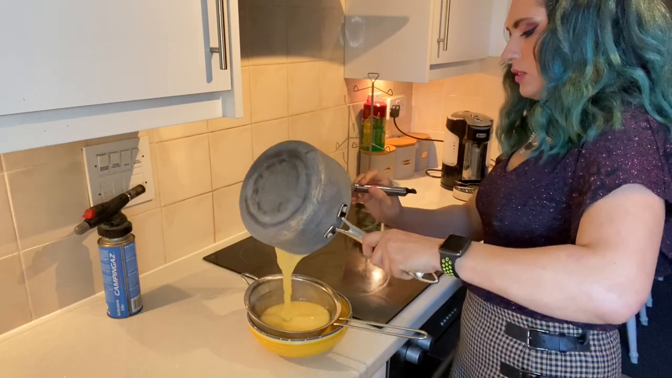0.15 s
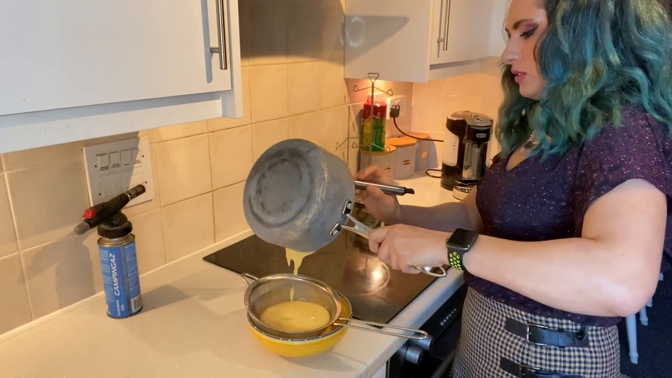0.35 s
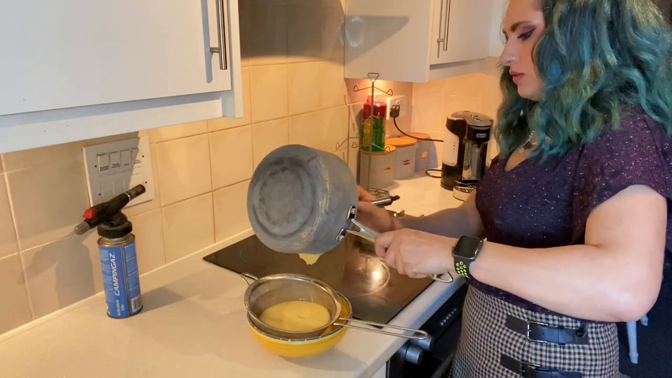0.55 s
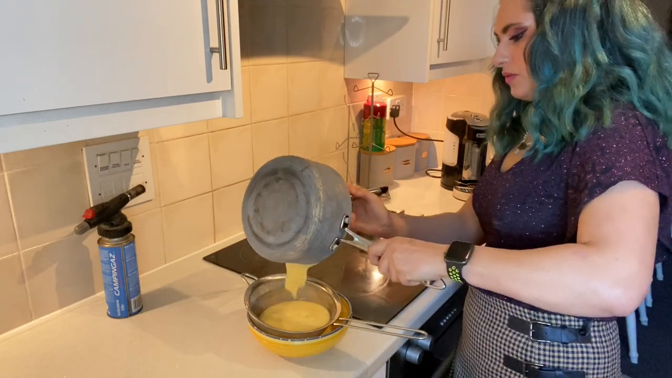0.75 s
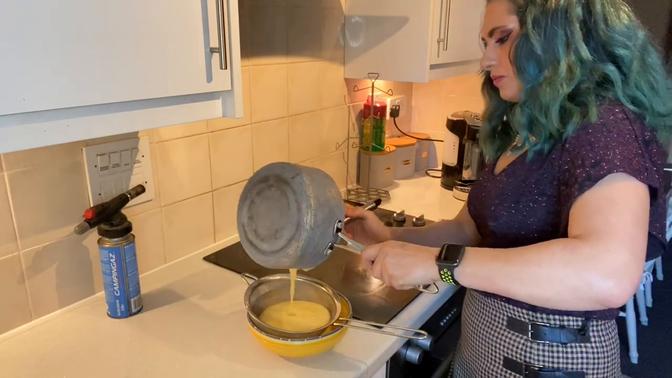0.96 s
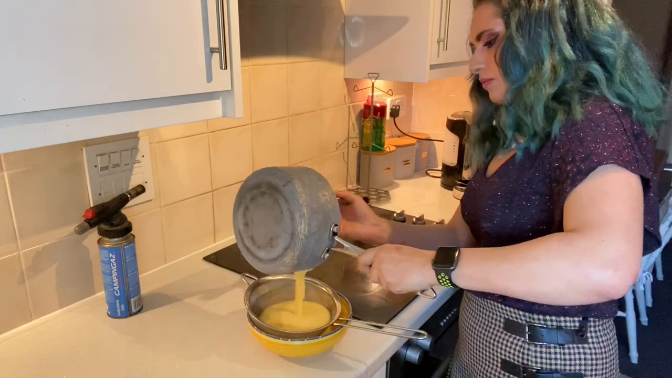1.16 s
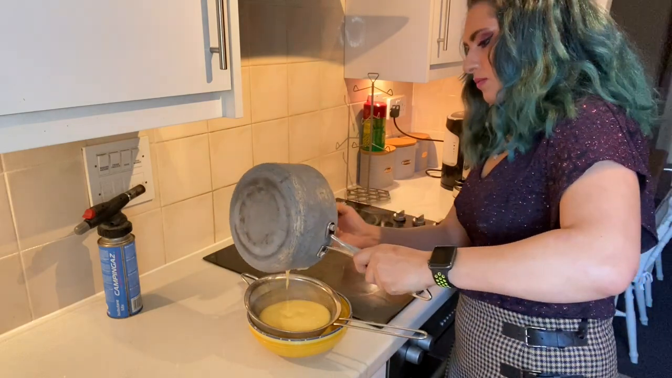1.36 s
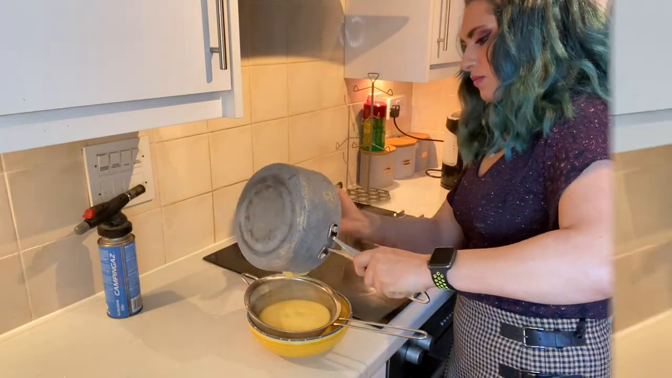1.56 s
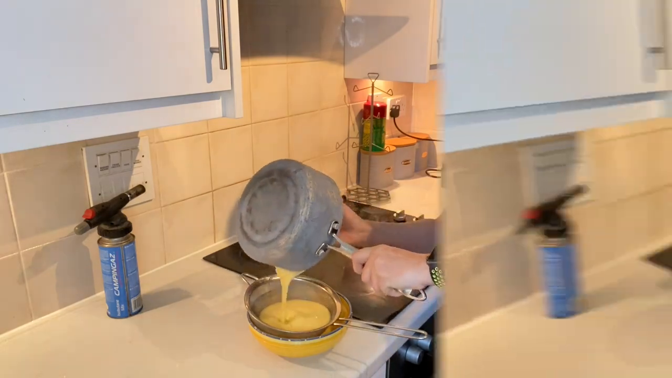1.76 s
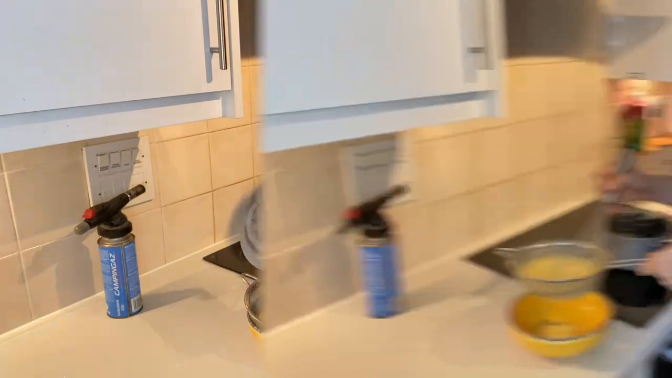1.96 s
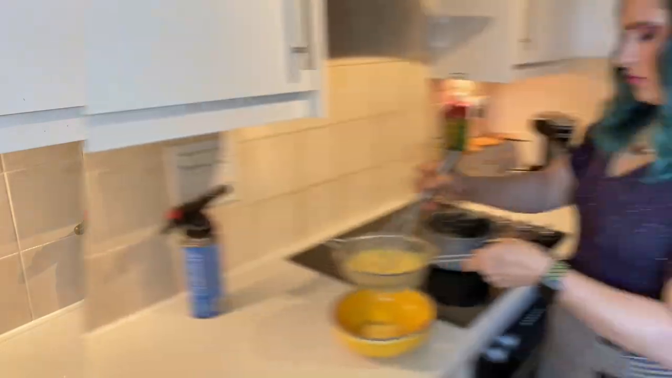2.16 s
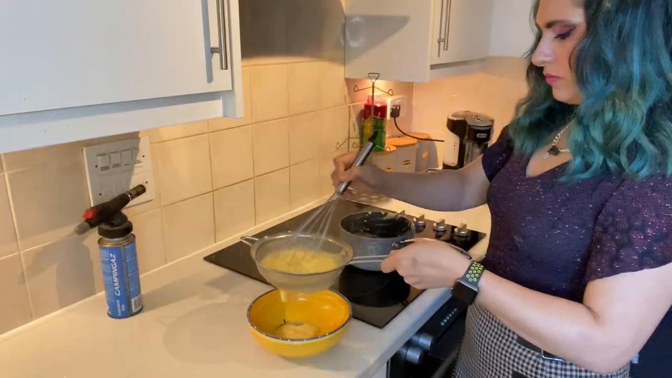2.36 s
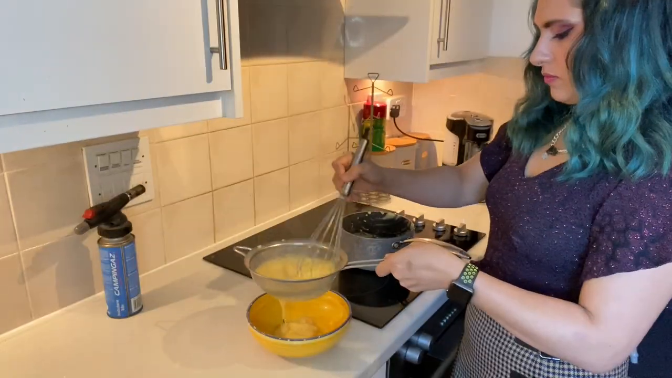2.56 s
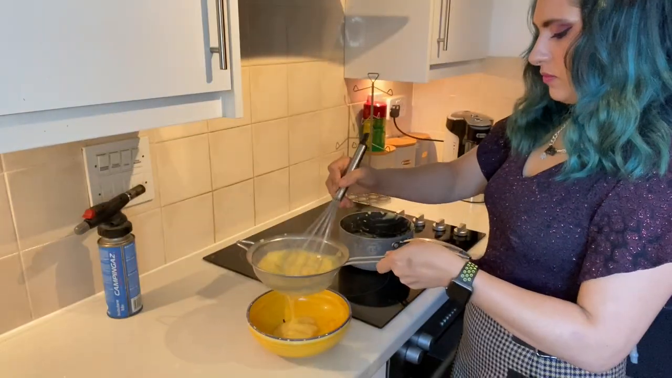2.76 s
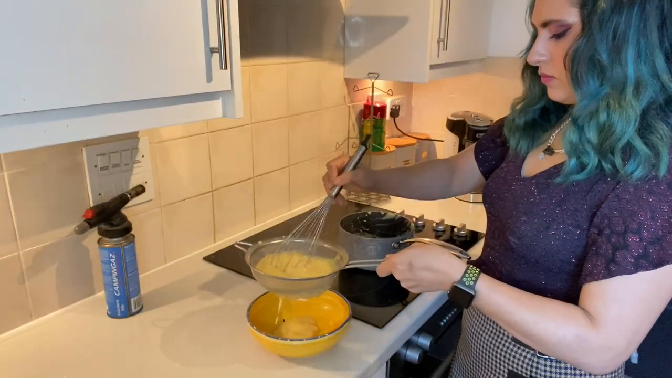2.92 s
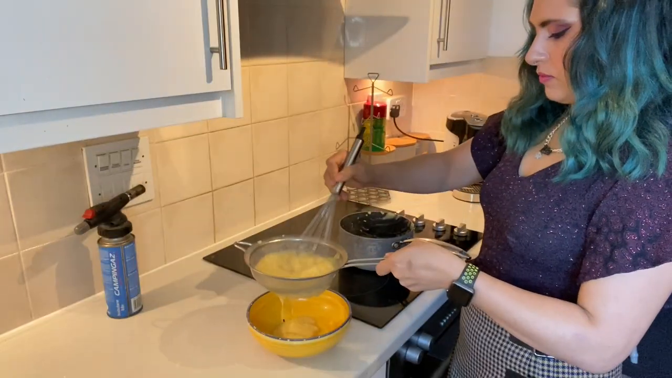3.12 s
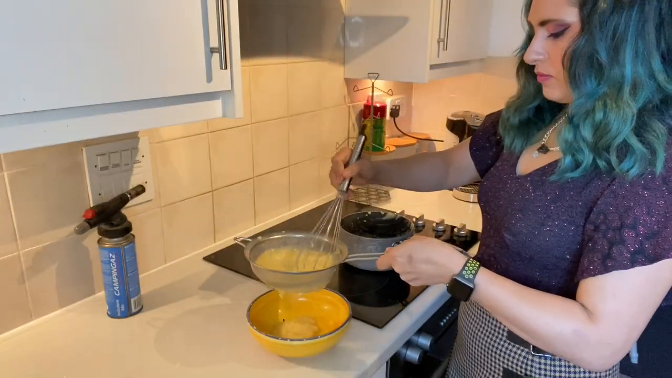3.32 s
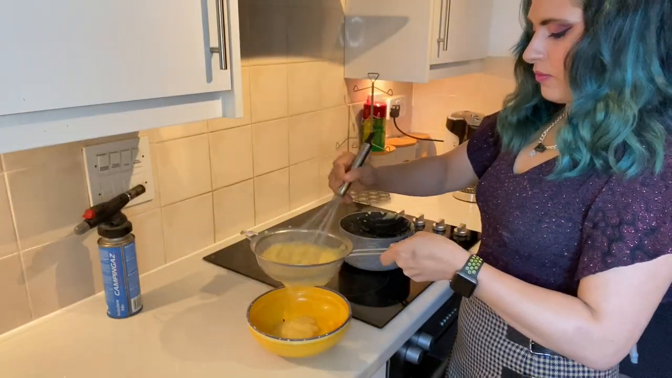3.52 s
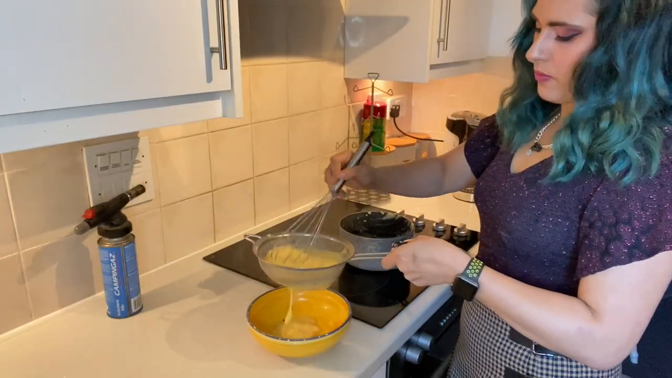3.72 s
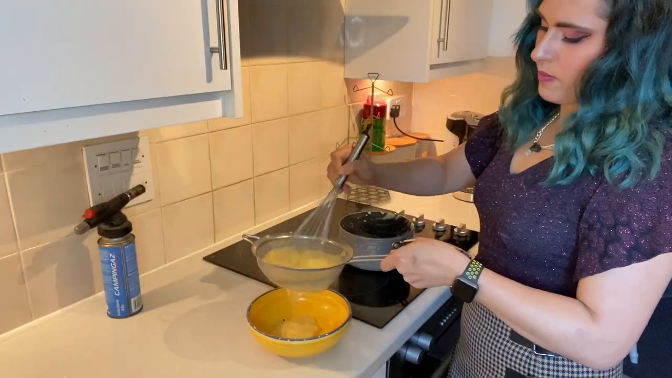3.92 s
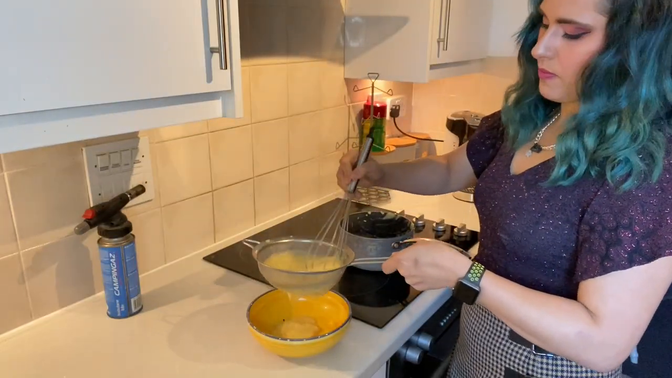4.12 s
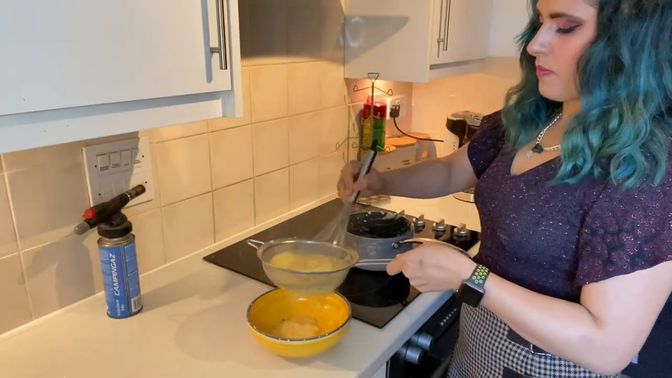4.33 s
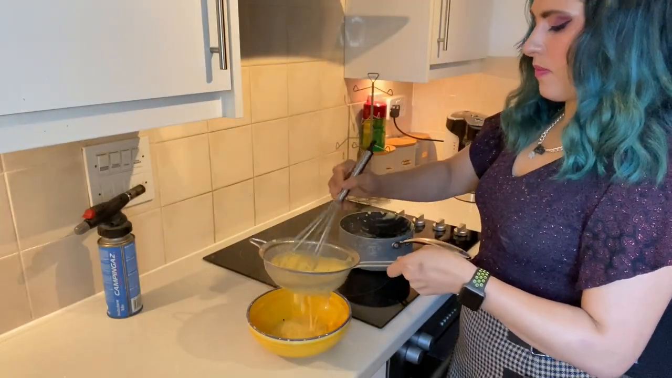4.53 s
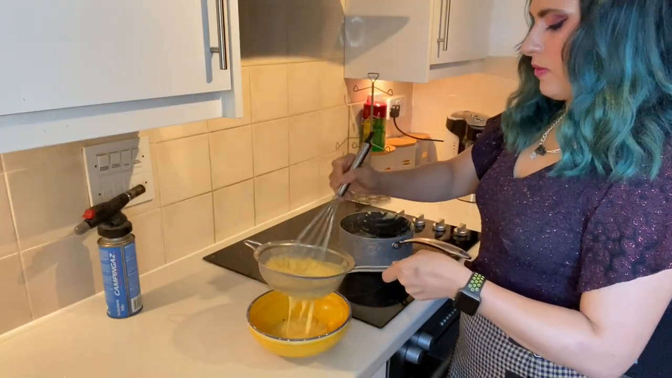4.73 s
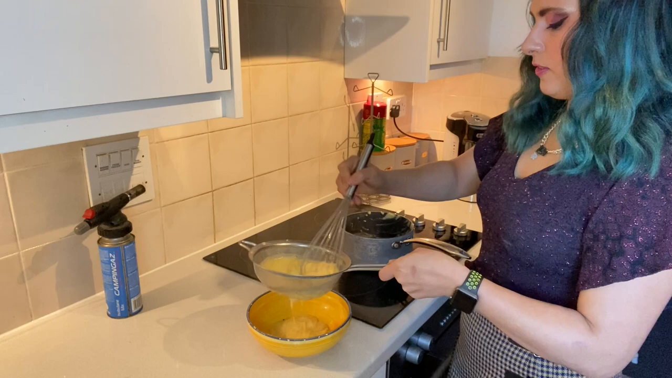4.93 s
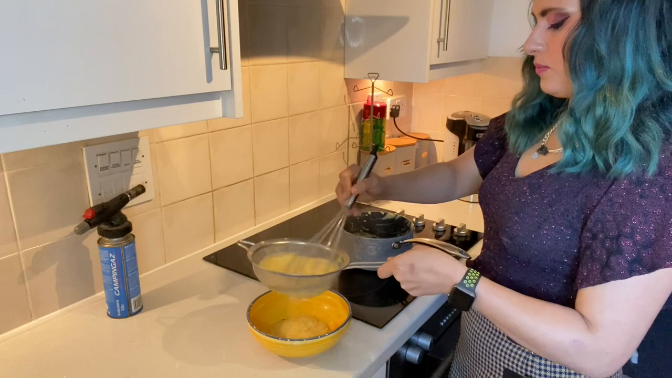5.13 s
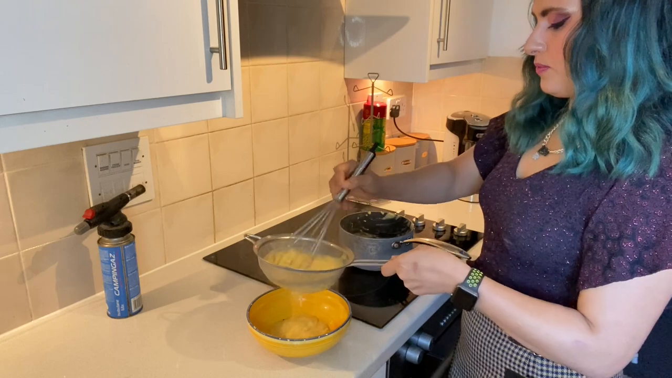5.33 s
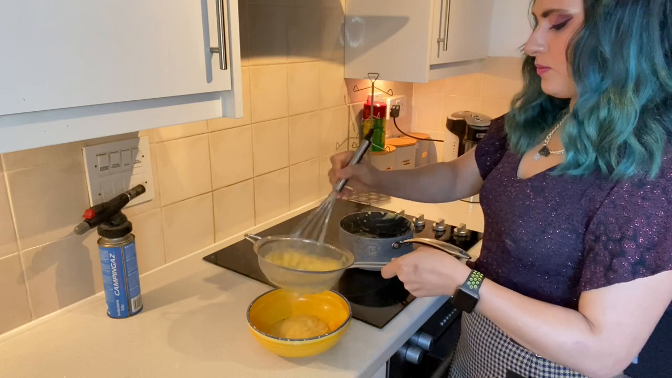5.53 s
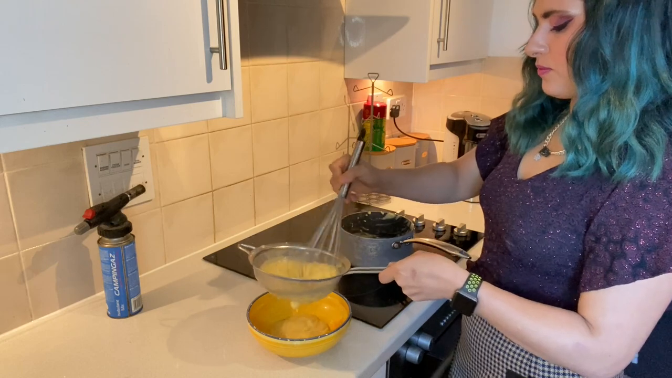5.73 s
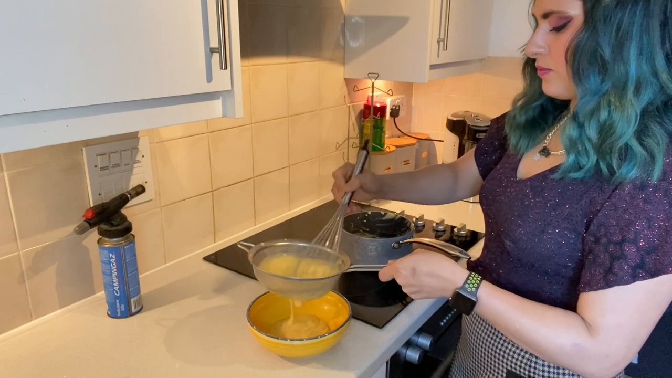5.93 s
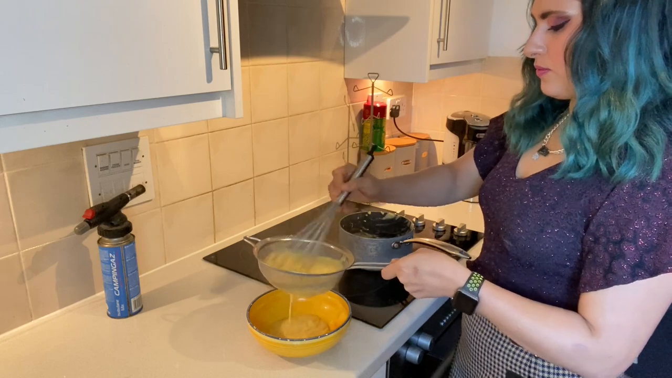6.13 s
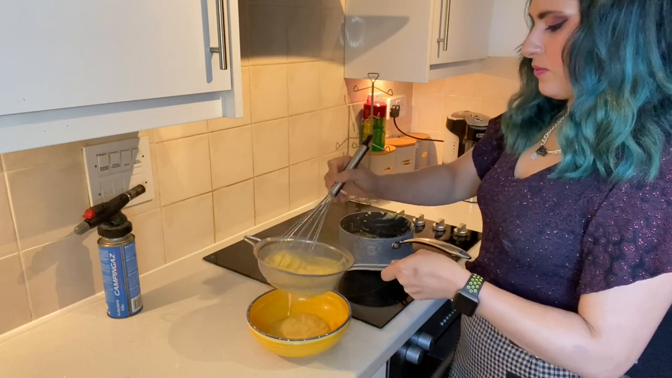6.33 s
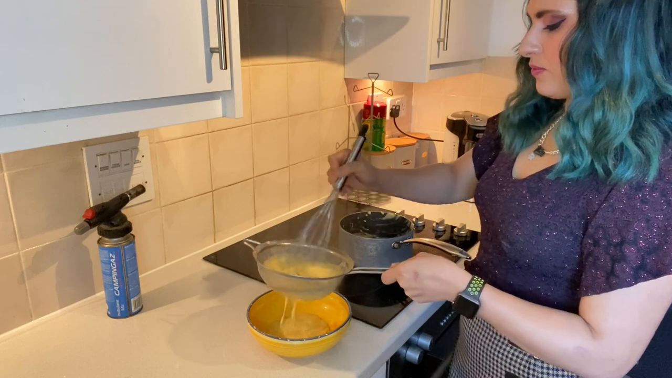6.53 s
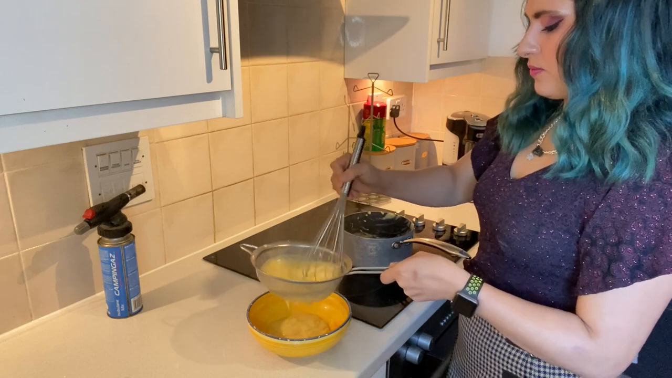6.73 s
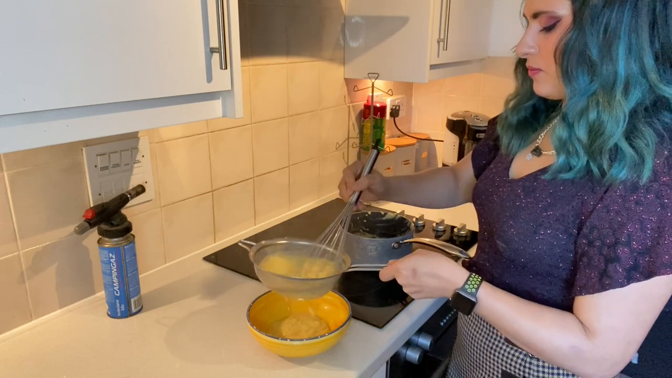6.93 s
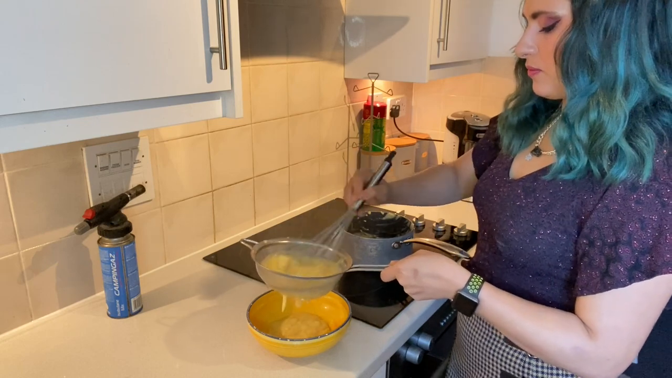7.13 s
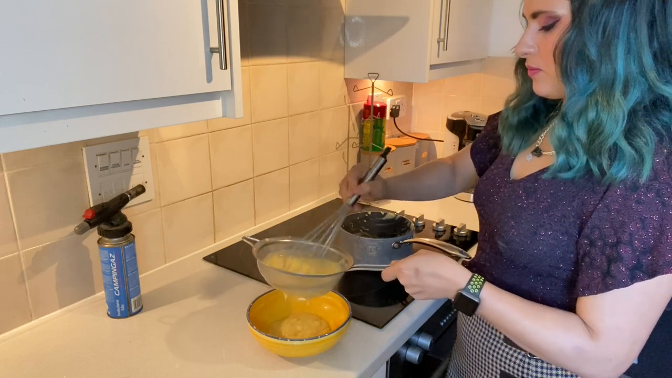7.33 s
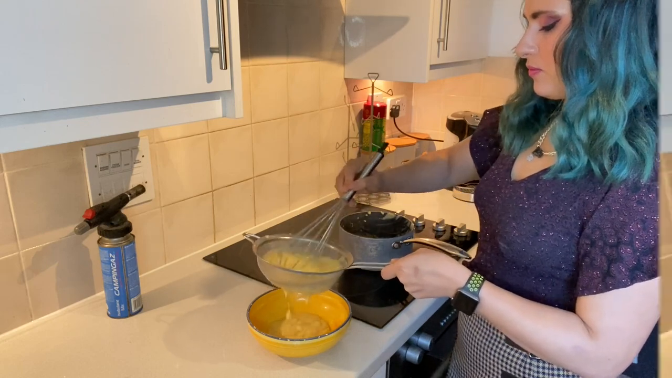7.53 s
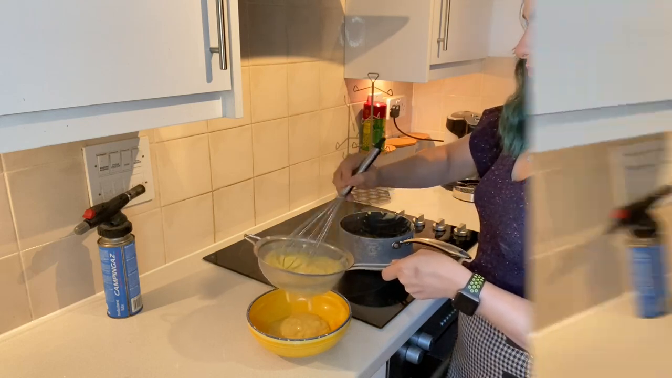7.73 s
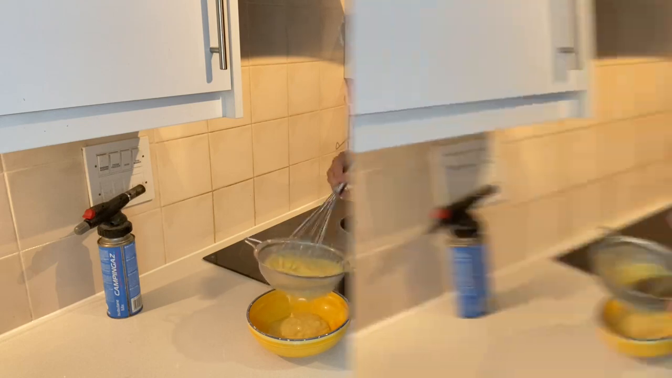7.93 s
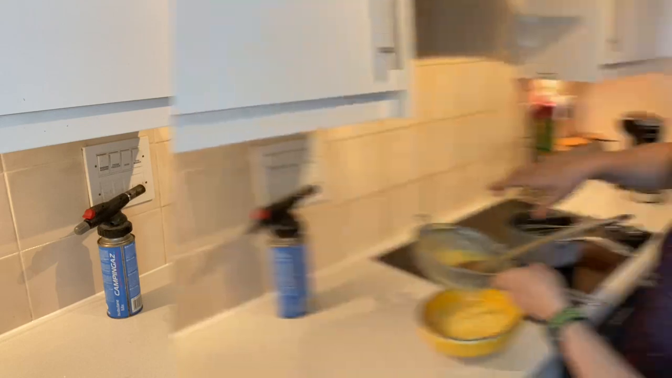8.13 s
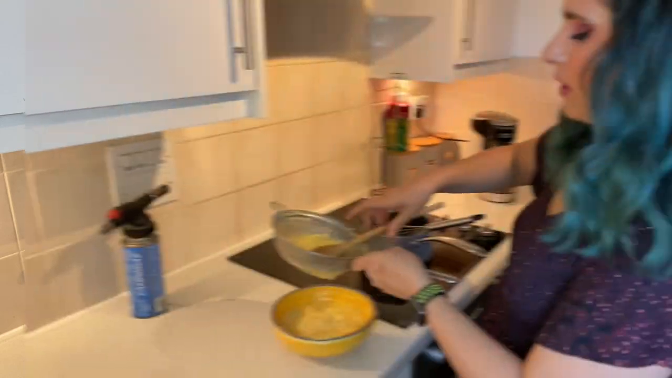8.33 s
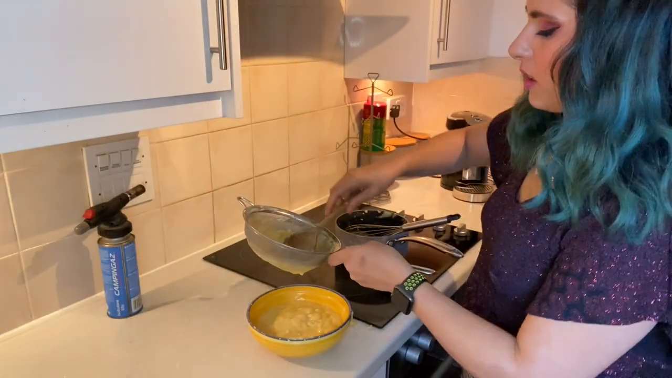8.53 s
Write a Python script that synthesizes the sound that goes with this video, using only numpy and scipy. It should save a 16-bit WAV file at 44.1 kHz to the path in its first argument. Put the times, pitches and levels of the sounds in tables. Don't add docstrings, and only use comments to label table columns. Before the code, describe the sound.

Close stereo pickup in a small tiled kitchen with short, bright reflections, faint hush and low rumble that comes and goes. From 0 to 0.3 seconds there are only faint taps; then a wire whisk rasps inside a steel saucepan, damped by curd. Sharper knocks come near 0.8, 1.15 and 1.35, with a brief chattering metallic song around 1.3. The loudest clanks, on bare ringing steel, fall at 1.55, 1.68 and 1.93. At 2.0 the pan gives way to a sieve: tentative wiry pushes, thinner and quieter around 3.0. From 3.4 to 6.7 the whisk circles steadily, roughly four strokes a second, each a tick and mesh hiss followed by a rasping, squelchy push, low plops and hollow bowl resonance. From 6.7 to 8.2 come shorter, irregular dabs and flicks. Then near quiet, with a faint rising slide and whine until 8.6.

```python
import sys
import numpy as np
from scipy import signal
from scipy.fft import rfft, irfft, next_fast_len
from scipy.io import wavfile

SR = 44100
rng = np.random.default_rng(int(sys.argv[2]) if len(sys.argv) > 2 else 0)


def wav_out(sig):
    wavfile.write(sys.argv[1], SR, np.round(np.clip(np.atleast_2d(sig).T, -1, 1) * 32767).astype(np.int16))


def attenuation_scalar(level_db):
    decades = np.asarray(level_db, float) / 20
    return 10 ** decades


N = 377930

# start in [s], hold in [s], deep level in [dB], upper level in [dB].
RUMBLE = [
    (-.5, 9.5, -85, -81.5),
    (-.5, 2.82, -66.5, -67.5),
    (4.47, 0.14, -93, -65.5),
    (5.206, 0.2, -84, -64),
    (5.446, 0.082, -67, -59),
    (6.716, 0.26, -80, -67),
    (7.79, 0.2, -77, -75),
    (8.148, 0.36, -71, -99),
]
# frequency in [Hz], density in [dB per Hz].
HUSH = [(140, -31), (230, -13.5), (308, 8), (569, -19.5), (847, -14), (1340, -22.5), (9000, -29.5),
        (11700, -30.5), (19800, -120)]
# time in [s], level in [dB].
END_WHINE = [
    (8.36, -79),
    (8.57, -67.5),
]

# start in [s], hold in [s], bright scrape in [dB], pan wall in [dB].
PAN_DRAG = [(0.327, 0.12, -73, -52.5), (0.388, 0.1, -41.5, -48), (0.508, 0.084, -36.5, -51.5),
            (0.788, 0.015, -34, -41.5), (0.832, 0.061, -33.5, -51), (0.918, 0.037, -43, -49),
            (1.092, 0.051, -40, -42), (1.153, 0.042, -40, -44.5), (1.246, 0.19, -39.5, -56),
            (1.542, 0.03, -30, -9.5), (1.62, 0.06, -45, -66), (1.682, 0.03, -43.5, -46),
            (1.758, 0.86, -57, -54), (1.921, 0.012, -34, -21), (1.99, 0.32, -55, -45)]
# time in [s], peak in [dB], wall ring in [dB relative],
# rim ring in [dB relative], clatter t60 in [s].
PAN_KNOCKS = [(0.0807, -59.5, -10, -31, 0.23), (0.122, -57.5, -20, -40, 0.091), (0.233, -60, -9, -45, 0.12),
              (0.282, -47.5, -9, -44, 0.099), (0.3338, -36.5, 3, -42, 0.0076),
              (0.382, -37, -13, -16, 0.071), (0.414, -40.5, -50, 5, 0.59), (0.541, -43, -38, 11, 0.09),
              (0.736, -54, -32.5, -30, 0.06), (0.7825, -26.5, -1, -4, 0.09), (0.861, -36.5, -28, 5, 0.095),
              (1.098, -41, 1, -51, 0.018), (1.157, -20.5, -56, -9.5, 0.047), (1.244, -38.5, -21, -20, 1),
              (1.34, -26.5, -35.5, -9.5, 0.091), (1.349, -23.5, -43, -22, 0.074),
              (1.547, -15.5, -3.5, -50, 0.033), (1.6759, -19.5, -11, -10, 0.051),
              (1.931, -22, 8, -52, 0.038), (1.989, -28.5, -24, -11, 0.092)]
# frequency in [Hz], level in [dB], t60 in [s].
PAN_WALL = [(618, -14, .22), (760, -9, .13), (833, 2, .11), (991, -24, .12), (1429, -14, .15),
            (1544, -15, .13), (1870, -20, .12), (2570, -21, .1), (3150, -21, .09), (4540, -21, .08)]
# frequency in [Hz], level in [dB], t60 in [s].
PAN_DAMPED = [(610, 0, 0.16), (744, 0, 0.1), (1200, -13, 0.026), (1310, -4, 0.017), (1765, -6.5, 0.031),
              (1936, -1.5, 0.04), (2440, 0, 0.026), (2930, -9.5, 0.031), (4550, -20, 0.03)]
# frequency in [Hz], level in [dB], t60 in [s].
PAN_RIM = [(5350, 0, .06), (5600, -3, .05), (5820, -2, .05), (5960, -5, .05), (6950, -7, .04),
           (7280, -5, .045), (8200, -7, .035)]
# frequency in [Hz], density in [dB per Hz].
PAN_RASP = [(350, -34.5), (480, -10), (650, -2), (1500, -20), (2800, -3.5), (4900, -1.5), (5600, 6),
            (6600, -5), (9300, 1), (11000, -5.5), (14000, -10), (15850, -27), (16100, -66)]
# frequency in [Hz], level in [dB], t60 in [s].
PAN_SING = [(777, -12, 0.1), (1570, -6.5, .07), (2255, -0.5, 0.081), (3096, -2, 0.11), (4093, 5.5, 0.04),
            (5100, -14.5, 0.041), (6380, 0.5, 0.04)]
# time in [s], level in [dB].
SING = [
    (1.22, -53.5),
    (1.26, -38.5),
    (1.31, -39.5),
    (1.35, -46),
    (1.4, -80.5),
]
# time in [s], shift as a [share].
SING_BENDS = [
    (1.22, 0.04),
    (1.268, 0.0062),
    (1.31, -0.0038),
    (1.36, .005),
    (1.4, -0.0096),
]
# time in [s], peak in [dB], pitch in [Hz].
CATCHES = [(.418, -44, 794), (.56, -43, 1300), (.785, -44, 1200), (.853, -40.5, 1354), (.868, -46, 788),
           (.868, -48, 237), (1.175, -40.5, 652), (1.278, -34.5, 2255), (1.268, -36, 1570),
           (1.345, -51, 265), (1.41, -38.5, 620), (1.55, -34, 1536), (1.566, -21.5, 841),
           (1.556, -34.5, 2294), (1.635, -34.5, 1430), (1.158, -47, 1218), (1.578, -31.5, 1533),
           (1.925, -24.5, 840.5), (1.945, -47, 1465)]
# band centre in [Hz], t60 in [s].
KITCHEN = [(200, 0.33), (1000, 0.32), (4000, 0.3), (14000, 0.25)]

# time in [s], peak
# in [dB], low part in [dB relative], hold in [s], hiss in [dB].
MESH_TICKS = [(2.017, -58, -30, 0.28, -58), (2.267, -37, -2.5, 0.18, -48.5),
              (2.545, -28.5, -17.5, 0.13, -49), (2.9096, -46.5, -48, 0.022, -50.5),
              (3.0083, -52, 2.5, 0.021, -42.5), (3.156, -38.5, -15, 0.075, -62),
              (3.265, -61, -12, 0.01, -43.5), (3.3555, -33.5, -14, 0.4, -54.5),
              (3.611, -30.5, -17, 0.24, -50), (3.874, -32, -15, 0.23, -53),
              (4.128, -31.5, -14, 0.23, -50.5), (4.395, -31, -22, 0.28, -48.5),
              (4.659, -36.5, -33, 0.27, -51.5), (4.92, -31, -15.5, 0.29, -51),
              (5.185, -29.5, -18, 0.25, -50), (5.451, -37, -14, 0.28, -51.5), (5.734, -40, -34, 0.24, -50),
              (5.98, -31.5, -21, 0.22, -47), (6.234, -32.5, -36, 0.28, -47.5),
              (6.496, -36.5, -22, 0.11, -43),
              (6.748, -38, -12, 0.07, -45.5), (6.877, -59, -21, 0.058, -54),
              (6.985, -37.5, -41, 0.086, -45.5), (7.044, -32.5, -13, .005, -60),
              (7.0506, -28, -20, 0.013, -64), (7.064, -36, -25, 0.22, -59), (7.252, -36, -31, 0.079, -53.5),
              (7.499, -56, -7, 0.015, -45), (7.599, -41, -34, 0.012, -49.5), (7.732, -51, -21, 0.0084, -46),
              (7.806, -56, -4, 0.022, -46), (7.906, -45, -26, 0.051, -46), (7.927, -39, -13, 0.02, -56),
              (7.998, -64, -15, 0.03, -52), (8.152, -51, -58, 0.12, -68), (8.366, -58, -20, 0.25, -88)]
# start in [s], thump on the frame in [dB], hold in [s],
# push in [dB], bowl in [dB].
PROBES = [
    (2.073, -40, 0.15, -54, -52),
    (2.257, -35.5, 0.022, -48, -77),
    (2.336, -39, 0.17, -51, -53),
    (2.625, -51, 0.037, -45.5, -52),
    (2.744, -73, 0.034, -54, -55),
    (2.905, -45.5, 0.011, -56, -61),
    (3.149, -52, 0.065, -50.5, -56),
    (3.261, -31.5, 0.16, -56.5, -62),
    (3.435, -37.5, 0.083, -51, -50),
]
# start in [s], thump on the frame in [dB], hold in [s], push in [dB], bowl in [dB].
CIRCLES = [(3.676, -28.5, 0.13, -48.5, -52.5), (3.931, -43, 0.14, -46.5, -52.5),
           (4.196, -31.5, 0.14, -46.5, -51), (4.444, -45, 0.15, -45, -46.5), (4.716, -47, 0.16, -47, -50),
           (4.99, -58, 0.15, -48.5, -52), (5.246, -55, 0.16, -47, -57), (5.51, -37.5, 0.12, -46.5, -46),
           (5.658, -36.5, 0.095, -52, -52), (5.787, -34, 0.16, -48.5, -51.5), (5.872, -37, 0.075, -51, -70),
           (6.048, -29, 0.14, -50.5, -46.5), (6.133, -33, 0.11, -52.5, -57),
           (6.301, -29.5, 0.19, -50.5, -51.5), (6.556, -26, 0.14, -48.5, -52)]
# start in [s], thump on the frame in [dB], hold in [s], push in [dB], bowl in [dB].
DABS = [(6.794, -31, 0.045, -46.5, -52), (6.891, -33, 0.017, -47, -44), (7.056, -35, 0.12, -50.5, -47),
        (7.287, -33, 0.13, -53.5, -52.5), (7.504, -27.5, 0.065, -59.5, -50),
        (7.596, -31.5, 0.017, -53.5, -49.5), (7.735, -34, 0.026, -54, -44.5), (7.8, -29, 0.018, -46.5, -60),
        (7.934, -27.5, 0.047, -59, -52), (8.012, -28.5, 0.022, -56, -51.5), (8.149, -39.5, 0.027, -79, -52),
        (8.207, -67.5, 0.023, -54, -83), (8.356, -51, 0.27, -73, -96)]
# frequency in [Hz], density in [dB per Hz].
MESH_HISS = [(1500, -5), (2800, -28), (4000, 0), (6000, 2), (8400, 1.5), (10300, -1.5), (13500, -1.5),
             (15850, -4), (16100, -44)]
# frequency in [Hz], density in [dB per Hz].
FRAME_RASP = [(600, -18.5), (1000, 10), (1800, -3), (3000, -2.5), (4500, -7.5)]
# frequency in [Hz], level in [dB], t60 in [s].
FRAME = [(1273, 0.5, 0.17), (1517, 0.5, 0.0099), (2120, -3, 0.13), (2420, 5, 0.0042)]
# frequency in [Hz], level in [dB], t60 in [s].
WIRES = [(1597, -5.5, 0.014), (3190, -4, 0.0035), (8370, 5, 0.0033), (10000, 4.5, 0.0073),
         (12700, -0.5, 0.029)]
# frequency in [Hz], level in [dB], t60 in [s].
CURD = [(390, -3, 0.12), (487, -4, 0.073), (615, -12, 0.094), (660, -1.5, 0.015), (733, -5.5, 0.045),
        (823, -1.5, 0.023), (1058, -6.5, 0.046)]
# frequency in [Hz], level in [dB], t60 in [s].
BOWL = [(318, -1.5, 0.11), (310.3, -4.5, 0.087), (374, -9, 0.11)]
# time in [s], peak in [dB], pitch in [Hz].
PLOPS = [(2.09, -39.5, 482), (2.222, -39.5, 308), (2.266, -31, 804), (2.345, -41, 480), (2.389, -38.5, 462),
         (2.516, -45, 320), (2.631, -35.5, 680), (2.925, -52, 479), (3.008, -42.5, 318), (6.17, -36, 312),
         (3.165, -42, 820), (3.279, -42.5, 733), (3.416, -42, 480), (3.682, -45, 680), (3.785, -36, 314),
         (3.195, -64, 304), (3.996, -42, 370), (4.208, -33, 700), (3.305, -43.5, 295), (4.451, -45, 301),
         (4.566, -39.5, 318), (4.656, -47, 293), (5.128, -42, 312), (4.863, -46, 304), (5.004, -36, 490),
         (5.097, -39, 401), (5.315, -44, 477), (5.361, -35.5, 298), (5.397, -34, 356), (5.521, -43, 614),
         (5.656, -36, 306), (5.785, -35, 500), (5.879, -37.5, 676), (6.053, -37, 740), (6.115, -37, 480),
         (6.605, -43, 305), (6.418, -34, 301), (6.556, -45, 296), (6.795, -44, 487), (6.885, -38.5, 659),
         (7.051, -44.5, 310), (7.124, -43, 393), (7.183, -40, 318), (7.297, -39, 495), (7.379, -37, 314),
         (7.51, -40, 312), (7.585, -35.5, 326), (7.741, -40.5, 317), (7.787, -42, 318), (5.285, -40, 740),
         (5.895, -35.5, 315), (8.145, -45.5, 834), (8.211, -60, 318), (8.292, -57, 715)]
# time in [s], peak in [dB], pitch in [Hz].
FLICKS = [(2.0738, -61, 1310), (2.1252, -48, 2520), (2.199, -50, 2320), (2.2673, -38, 1530),
          (2.3402, -45, 3200), (2.5008, -53, 1440), (2.5457, -42, 2420), (2.631, -43, 1576),
          (2.9139, -54, 1227), (3.0161, -47.5, 1237), (3.1633, -47, 2680), (3.275, -43, 1300),
          (3.3579, -51, 1580), (3.4397, -50, 1590), (3.6153, -46, 1630), (3.6806, -40, 1570),
          (3.8088, -45, 2580), (3.8782, -53, 1570), (3.94, -41, 1560), (4.1296, -43.5, 1590),
          (4.197, -40, 2050), (4.2264, -31.5, 1593), (4.398, -48, 3270), (4.4409, -46, 2400),
          (4.6609, -41, 2660), (4.7073, -42, 2460), (4.7377, -39, 2920), (4.838, -41, 2120),
          (4.9223, -54, 1670), (5.1872, -37, 3170), (5.2456, -50, 2930), (5.3194, -44, 2440),
          (5.4516, -49, 3200), (5.5269, -47, 1980), (5.6551, -55, 1500), (5.7848, -41, 1083),
          (5.8367, -46, 1600), (5.9829, -46, 2960), (6.0542, -43, 1222), (6.1725, -41, 2340),
          (6.2358, -43, 3470), (6.3057, -34, 3100), (6.4244, -41, 2360), (6.4882, -46, 1240),
          (6.5601, -40, 1490), (6.7467, -44, 2440), (6.7881, -42, 2050), (6.8953, -38, 2170),
          (6.9841, -51, 2610), (7.0495, -34, 2540), (7.1308, -39, 1108), (7.2939, -54, 2110),
          (7.5074, -48, 2160), (7.6027, -43, 2120), (7.7379, -44, 1237), (7.7978, -41, 1530),
          (7.928, -39, 2490), (8.0088, -56, 2200), (8.1515, -57, 1220), (8.2009, -56, 1240)]
# time in [s], level in [dB].
SLIDE = [
    (8.3, -106),
    (8.5, -79),
    (8.57, -68),
]
# start in [s], end in [s], low edge in [Hz], high edge in [Hz].
HOLLOWS = [
    (2.93, 3.1, 550, 766),
    (2.994, 3.29, 390, 596),
]

# attack in s, sag in dB per s, release in dB per s
RUMBLE_SHAPE = (0.059, 0.0, 54)
SCRAPE_SHAPE, WALL_SHAPE = (0.025, 25, 470), (0.0023, 21, 490)
HISS_SHAPE, RASP_SHAPE = (0.016, 31.7, 330), (0.0055, 9.9, 275)
SQUELCH_SHAPE, BOWL_SHAPE = (0.014, 7.8, 240), (0.014, 0.0, 320)

PAN_BARE_S = 1.535
SIEVE_ENTERS_S = 1.99, 2.05
TICK_T60_S, THUMP_T60_S = 0.089, 0.15
TOP_HZ = 16350


def rms_one(x):
    return x / np.sqrt(np.mean(x ** 2) + 1e-20)


def in_time(rows):
    s, *columns = np.transpose(rows)
    return [attenuation_scalar(np.interp(np.arange(N) / SR, s, c, left=-140, right=-140)) for c in columns]


def colour(x, spectrum):
    hz, level = np.transpose(spectrum)
    grid = np.maximum(np.fft.rfftfreq(4096, 1 / SR), 10)
    cepstrum = irfft(np.log(attenuation_scalar(np.interp(np.log(grid), np.log(hz), level))))
    cepstrum[1:2048] *= 2
    cepstrum[2049:] = 0
    response = irfft(np.exp(rfft(cepstrum)))
    return signal.oaconvolve(x, np.atleast_2d(response), axes=-1)[:, :N]


def band(x, low_hz, high_hz):
    return signal.sosfilt(signal.butter(3, [low_hz, high_hz], "band", fs=SR, output="sos"), x + 1e-18)


def wander(depth_db, rate_hz, size=N):
    knots = attenuation_scalar(depth_db * np.clip(rng.standard_normal(int(N / SR * 60) + 2), -2.5, 1.4))
    return np.interp(np.arange(size) * rate_hz / SR, np.arange(len(knots)), knots)


def friction(grainy_db, alike):
    sizes = attenuation_scalar(grainy_db * np.minimum(rng.exponential(1, N), 5))
    shared, own = rng.standard_normal(N), rng.standard_normal((2, N))
    return rms_one(sizes * (np.sqrt(alike) * shared + np.sqrt(1 - alike) * own))


def strokes(s, hold, level_db, shape):
    attack, sag, release = shape
    grid = np.arange(0, N + 64, 64)
    t = np.maximum(grid / SR - s[:, None], 0)
    held = np.minimum(t, hold[:, None])
    level_db = np.maximum(level_db[:, None] - sag * held - release * (t - held), -200)
    gains = attenuation_scalar(level_db) * (1 - np.exp(-np.minimum(t / attack, 20)))
    return np.interp(np.arange(N), grid, np.sqrt(np.sum(gains ** 2, axis=0)))


def bursts(times, peaks_db, t60s, rise_s):
    out, t = np.zeros(N + SR // 2), np.arange(SR // 2) / SR
    for s, peak_db, t60 in np.broadcast(times, peaks_db, t60s):
        decay = attenuation_scalar(peak_db - 60 * t / np.clip(t60, .008, .4))
        out[int(s * SR):][:len(t)] += decay * (1 - np.exp(-t / rise_s))
    return out[:N]


def lift_off(times, depth_db, lead_s):
    t = np.arange(N) / SR
    ahead = np.append(times, 99)[np.searchsorted(times, t)] - t
    return attenuation_scalar(-depth_db * np.exp(-ahead / lead_s))


def resonator(x, hz, t60, gain=1):
    r, w = attenuation_scalar(-60 / (t60 * SR)), 2 * np.pi * hz / SR
    return signal.lfilter([1, 0, -1], [1, -2 * r * np.cos(w), r * r], gain * x)


def body(drive, modes, wander_db=0, wander_hz=6.1, swell_t60=0):
    out = np.zeros((2, N))
    live = np.flatnonzero(np.abs(drive[0]) > 1e-5)
    span = slice(live[0], live[-1] + SR // 4)
    part = drive[:, span] + 1e-18
    for hz, level_db, t60 in modes:
        r = attenuation_scalar(-60 / (t60 * SR))
        grip = attenuation_scalar(level_db) * np.sqrt(1 - r * r) / 2 * wander(wander_db, wander_hz, size=part.shape[1])
        ring = resonator(part, hz, t60, grip)
        if swell_t60:
            q = attenuation_scalar(-60 / (swell_t60 * SR))
            ring = resonator(ring, hz, swell_t60, (1 - q * q) / 2)
        out[:, span] += ring
    return out


def plops(rows, cycles, rise_cycles, level_db, lean_db, pace_hz=None):
    out, t = np.zeros((2, N + SR)), np.arange(SR // 5) / SR
    sign = np.array([[1], [-1]])
    for (s, peak_db, hz), (lean, phase) in zip(rows, rng.uniform(-1.18, 1, (len(rows), 2))):
        age = t * (pace_hz or hz)
        shape = attenuation_scalar(peak_db + level_db - 60 * age / cycles) * (1 - np.exp(-age / rise_cycles))
        glide = 1 + 1.2 * phase * t / 2
        tone = np.sin(2 * np.pi * hz * t * glide + 0.6 * phase * sign)
        out[:, int(s * SR):][:, :len(t)] += 2 * shape * attenuation_scalar(lean_db * lean * sign) * tone
    return out[:, :N]


def background():
    s, hold, deep_db, upper_db = np.transpose(RUMBLE)
    deep, upper = strokes(s, hold, deep_db, RUMBLE_SHAPE), strokes(s, hold, upper_db, RUMBLE_SHAPE)
    rumble = deep * rms_one(band(friction(grainy_db=4, alike=0.67), 42, 108))
    rumble = rumble + upper * rms_one(band(friction(grainy_db=4, alike=0.64), 111, 245))
    whine = body(in_time(END_WHINE)[0] * friction(grainy_db=4, alike=0.25), [(1240, 2, 0.071)])
    hush_db = -68 + np.interp(np.arange(N) / SR, SIEVE_ENTERS_S, [0, -9.5])
    return rumble + whine + attenuation_scalar(hush_db) * rms_one(colour(friction(grainy_db=-2.0, alike=0.67), HUSH))


def chatter_song(push):
    sing = body(in_time(SING)[0] * push, PAN_SING, wander_db=1.5, wander_hz=30.45)
    bend = np.interp(np.arange(N) / SR, *np.transpose(SING_BENDS), left=0, right=0)
    read = np.arange(N) + np.cumsum(bend)
    return np.array([np.interp(read, np.arange(N), side) for side in sing])


def saucepan():
    s, hold, bright_db, wall_db = np.transpose(PAN_DRAG)
    bright, wall = strokes(s, hold, bright_db, SCRAPE_SHAPE), strokes(s, hold, wall_db, WALL_SHAPE)
    s, peak_db, wall_db, rim_db, t60 = np.transpose(PAN_KNOCKS)
    bright = attenuation_scalar(-10.5) * bright * wander(depth_db=6, rate_hz=45.0)
    bright = bright * lift_off(s, depth_db=9.0, lead_s=0.0018)
    clatter = bursts(s, peak_db - 20.5, t60, rise_s=0.00026)
    clatter = clatter + bursts(s, peak_db - 14.0, t60 / 6, rise_s=0.00026)
    rub, push = friction(grainy_db=2.5, alike=0.37), friction(grainy_db=1.5, alike=0.68)
    scrape = (bright + clatter) * rub
    rasp = colour(scrape, PAN_RASP) / np.std(colour(rub[:, :SR], PAN_RASP))
    crowd_hz = np.geomspace(1150, 9300, 32) * rng.uniform(.97, 1.03, 32)
    shell = attenuation_scalar(-9) * body(scrape, [(hz, -.0008 * hz, .07) for hz in crowd_hz], wander_db=6, wander_hz=14.0)
    rim_drive = attenuation_scalar(-22.0) * bright + bursts(s, peak_db + rim_db, 1.91 * t60, rise_s=0.0015)
    bare = np.arange(N) > PAN_BARE_S * SR
    wall_drive = attenuation_scalar(-2.5) * wall * bare * push
    wall_drive[:, (s * SR).astype(int) + 90] += attenuation_scalar(peak_db + wall_db + 11.0)
    rings = body(rim_drive * rub, PAN_RIM)
    rings = rings + attenuation_scalar(-6.0) * body(wall_drive, PAN_WALL, swell_t60=0.0067)
    rings = rings + attenuation_scalar(-7.5) * body(wall * ~bare * push, PAN_DAMPED, wander_db=6, wander_hz=9.0)
    rings = rings + chatter_song(push)
    jolt = bursts(s, peak_db + np.minimum(wall_db, 0) / 2, 0.3, rise_s=0.0035)
    thud = attenuation_scalar(-30.0) * jolt * rms_one(band(push, 295, 332))
    thud = thud + plops(CATCHES, cycles=125, rise_cycles=8.0, level_db=0.5, lean_db=1.5, pace_hz=1000)
    return attenuation_scalar(9.0) * rasp + thud + shell + band(rings, 663, 15000)


def kitchen(x):
    t, tail = np.arange(SR // 2) / SR, 0
    white = rng.standard_normal((2, SR // 2))
    for hz, t60 in KITCHEN:
        part = band(white, hz / 1.59, min(hz * 2.65, 19000))
        tail = tail + part * attenuation_scalar(-60 * t / t60) * np.minimum(t / 0.0044, 1)
    tail = tail / np.sqrt(np.sum(tail ** 2, axis=1, keepdims=True))
    return signal.oaconvolve(x, tail, axes=-1)[:, :N]


def sieve():
    s, peak_db, low_db, hold, hiss_db = np.transpose(MESH_TICKS)
    tick = bursts(s, peak_db - 16.0, TICK_T60_S, rise_s=0.00083)
    tick = tick + bursts(s, peak_db - 14, 0.015, rise_s=0.00018)
    hiss = strokes(s, hold, hiss_db, HISS_SHAPE) * lift_off(s, depth_db=8.5, lead_s=0.16)
    low_tick = bursts(s, peak_db + low_db + 0.5, TICK_T60_S, rise_s=0.001)

    s, peak_db, hold, push_db, bowl_db = np.transpose(PROBES + CIRCLES + DABS)
    hiss = hiss + strokes(s, hold, push_db - 13.5, RASP_SHAPE)
    rasp = attenuation_scalar(-1.0) * strokes(s, hold, push_db - 7.0, RASP_SHAPE) * wander(depth_db=6.0, rate_hz=50.0)
    rasp = rasp + bursts(s, peak_db - 18.5, THUMP_T60_S, rise_s=0.0011)
    squelch = attenuation_scalar(-4.0) * strokes(s, hold, push_db + 0.5, SQUELCH_SHAPE)
    squelch = squelch + bursts(s, peak_db - 16.5, THUMP_T60_S, rise_s=0.004)
    hollow = strokes(s, hold + 0.012, bowl_db + 4.5, BOWL_SHAPE)

    rub, knead = friction(grainy_db=3.0, alike=0.38), friction(grainy_db=-1.0, alike=0.19)
    mesh = (attenuation_scalar(1.0) * hiss * wander(depth_db=5.0, rate_hz=59) + tick) * rms_one(colour(rub, MESH_HISS))
    mesh = mesh + attenuation_scalar(4) * tick * rms_one(band(rub, 13000, TOP_HZ))
    strands = [(hz, 0, .016) for hz in np.geomspace(1900, 9000, 14)]
    mesh = mesh + attenuation_scalar(-16.0) * body(hiss * rub, strands, wander_db=6, wander_hz=20.0)
    wires = attenuation_scalar(-3.5) * body(tick * rub, WIRES[2:], wander_db=6)
    wires = wires + attenuation_scalar(1.5) * body(low_tick * rub, WIRES[:2])

    frame = attenuation_scalar(3.0) * rasp * rms_one(colour(knead, FRAME_RASP))
    frame = frame + attenuation_scalar(-12.5) * body(rasp * knead, FRAME, wander_hz=17.0)
    deep = attenuation_scalar(np.interp(np.arange(N) / SR, (2.92, 2.97, 3.3, 3.42), [0, -22, -22, 0]))
    frame = frame * deep ** 0.15
    curd = deep * body(squelch * knead, CURD[:4], wander_db=6.0, wander_hz=24.17)
    curd = attenuation_scalar(-3) * (curd + body(squelch * knead, CURD[4:], wander_db=2.5, wander_hz=24.75))
    bowl_drive = hollow * friction(grainy_db=3.0, alike=0.96)
    bowl = attenuation_scalar(-9.5) * body(bowl_drive, BOWL, wander_db=6, wander_hz=18.0)

    thud = bursts(s, peak_db - 17.5, 0.094, rise_s=0.0084) * rms_one(band(knead, 260, 325))
    thud = thud + plops(PLOPS, cycles=26.6, rise_cycles=4.0, level_db=0, lean_db=-0.5)
    thud = thud + plops(FLICKS, cycles=100, rise_cycles=7.2, level_db=-7.5, lean_db=3.5)
    thud = thud + in_time(SLIDE)[0] * rms_one(band(knead, 1500, 6000))
    entry = np.interp(np.arange(N) / SR, SIEVE_ENTERS_S, [0, 1])
    return entry * (mesh + wires + frame + band(curd, 432, 1427) + band(bowl, 259, 415) + thud)


def hollowed(x):
    t = np.arange(N) / SR
    for start, end, low_hz, high_hz in HOLLOWS:
        share = np.clip(np.minimum(t - start, end - t) * 40, 0, 1)
        notch = signal.butter(1, [low_hz, high_hz], "band", fs=SR, output="sos")
        x = x - share * signal.sosfilt(notch, x)
    return x


def scene():
    low_cut = signal.butter(8, 188, "high", fs=SR, output="sos")
    near = signal.sosfilt(low_cut, saucepan() + sieve())
    return hollowed(near + attenuation_scalar(-7.5) * kitchen(near) + background())


def band_limit(x):
    return signal.sosfilt(signal.butter(12, 16350, fs=SR, output="sos"), x)


def record(dry):
    size = next_fast_len(N + 512)
    top_cut = signal.cheby2(12, 50, TOP_HZ + 250, fs=SR, output="sos")
    left, right = rfft(signal.sosfilt(top_cut, dry), size)
    hz = np.fft.rfftfreq(size, 1 / SR)
    left = left * np.exp(-2j * np.pi * hz * 2 / SR)
    share = np.interp(hz, (4980, 9100), [0, .995])
    turn = 2 * np.pi * (hz - 7837) / 5210
    copy = left * np.exp(-1j * (turn - 0.18 * np.sin(2 * turn)))
    right = np.sqrt(share) * copy + np.sqrt(1 - share) * right
    stereo = irfft([left, right], size)[:, :N]
    overload = 0.9
    return band_limit(overload * np.tanh(stereo / overload))


dry = scene()
out = record(dry)
wav_out(out)
```